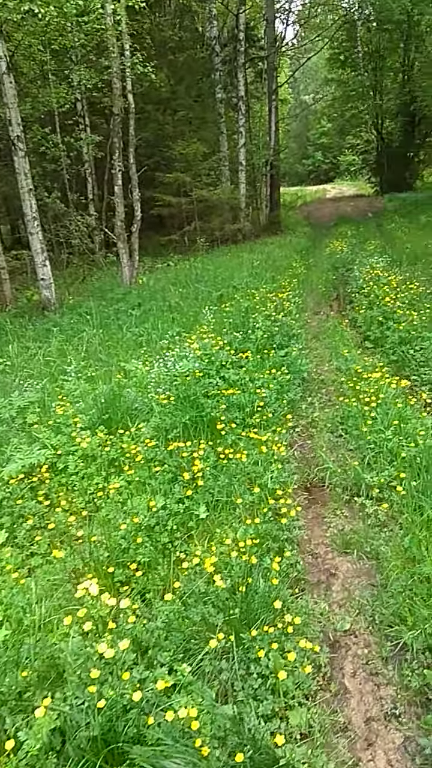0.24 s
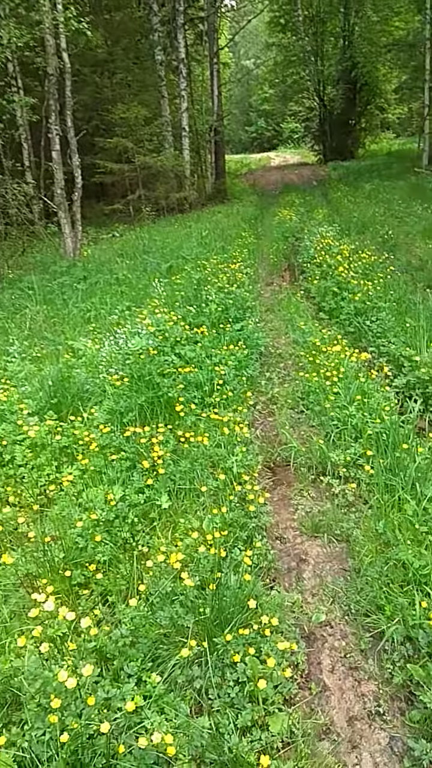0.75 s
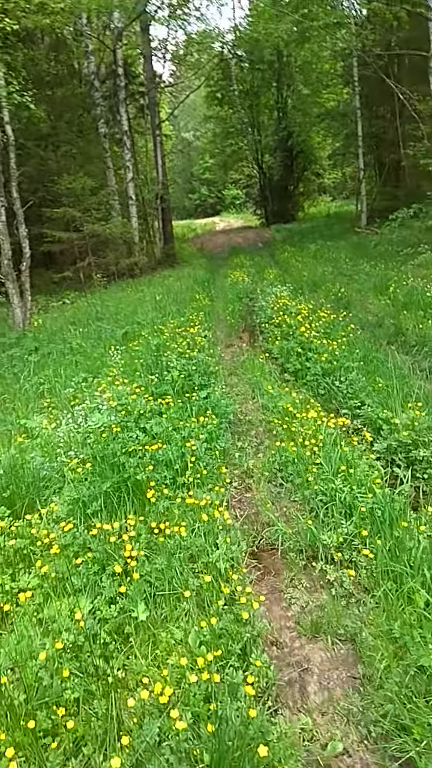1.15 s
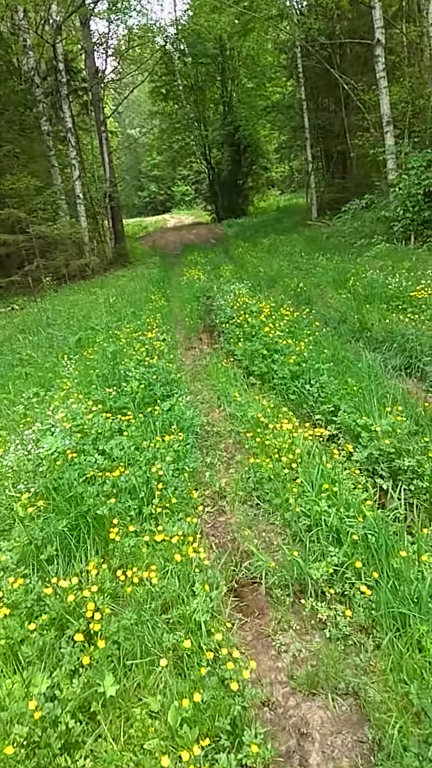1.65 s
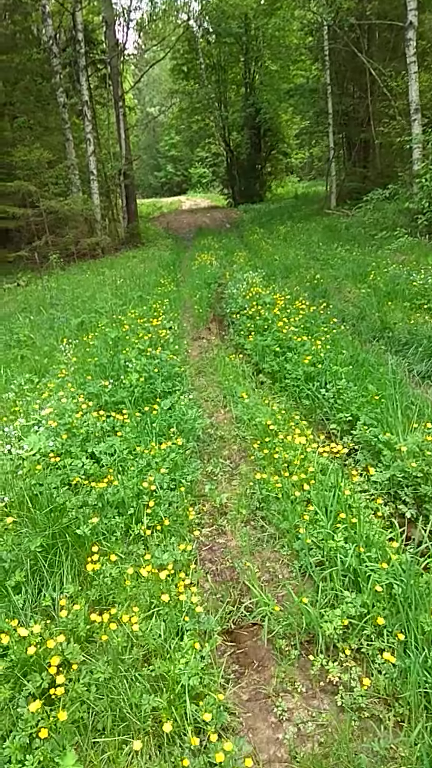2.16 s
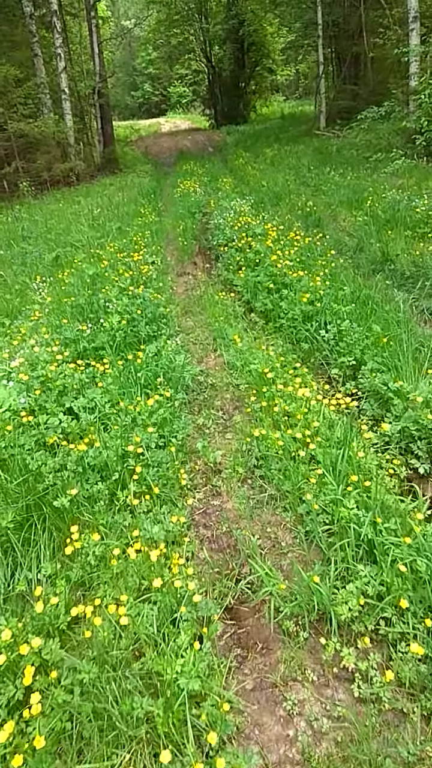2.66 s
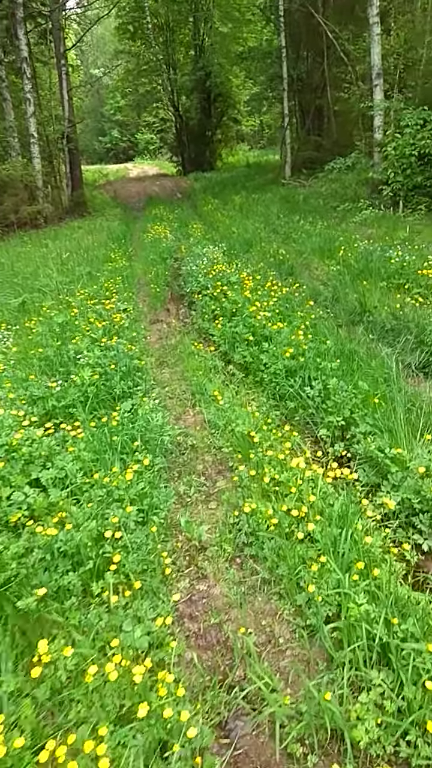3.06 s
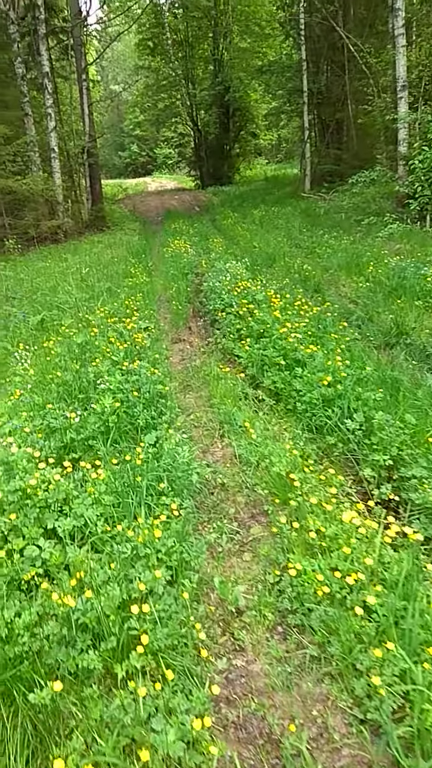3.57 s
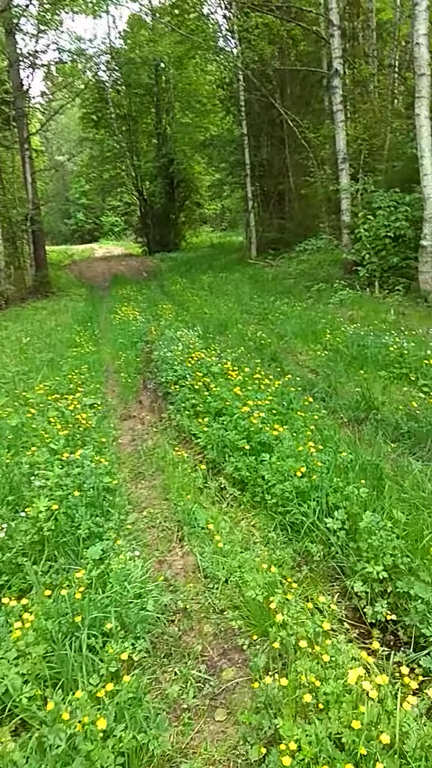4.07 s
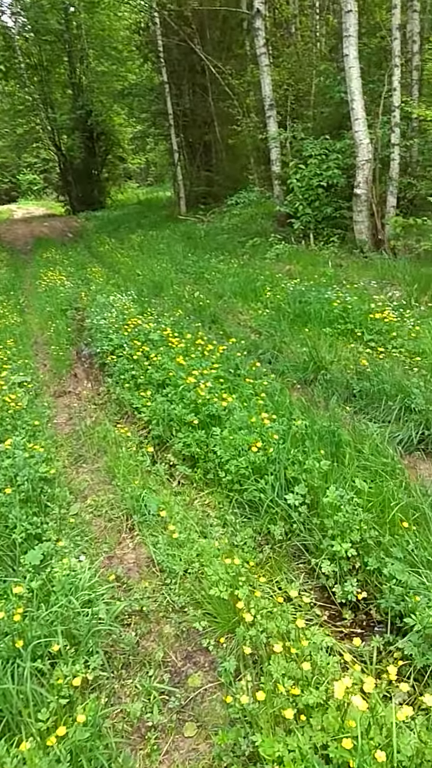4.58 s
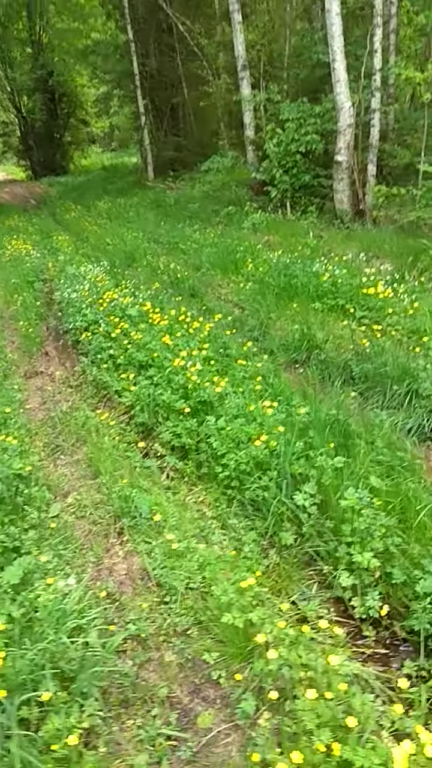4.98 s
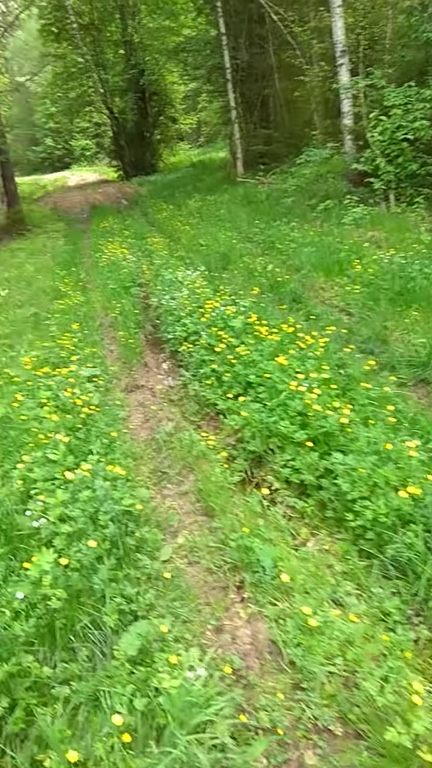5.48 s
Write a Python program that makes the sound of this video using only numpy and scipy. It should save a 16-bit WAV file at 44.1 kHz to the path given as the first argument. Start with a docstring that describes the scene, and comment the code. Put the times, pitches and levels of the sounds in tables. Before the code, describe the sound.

Close, bright swishes of long grass brush past a walker's legs in uneven sweeps, with dry stalks ticking and snapping. Heels thud softly on earth and turf. Far birds whistle at first, trill through the middle and whistle again near the end. Open forest track, quiet air; handheld stereo microphone, grass brighter and mostly louder on the left.

```python
"""Walk through long grass

Someone walks through long grass on a forest track, a two-port recorder in hand, its left port facing the legs.
Blade tips, leaves and stems rustle as patchy noise puffs under each sweep; dry stalks snap as noise bursts
through resonances; heels ring the ground and crush turf, and soles press it in dull swells.
Far songbirds whistle and trill as gliding sines scattered among the trees, over breeze and a steady hush."""
import sys
import numpy as np
from scipy import signal
from scipy.fft import rfft, irfft
from scipy.io import wavfile
from scipy.ndimage import map_coordinates

SR = 44100
rng = np.random.default_rng(int(sys.argv[2]) if len(sys.argv) > 2 else 0)


def natural_amplitude(level_db):
    """Convert a level in decibels to a linear amplitude factor, elementwise."""
    exponent = np.asarray(level_db, float) / 20
    return 10 ** exponent


def transcribe(u):
    """Save the signal u as a 16-bit wav file named by the first command-line argument.

    u: samples, shape (n,) or (channels, n), limited to [-1, 1]; the rate is SR.
    q: integer samples, one column per channel.
    """
    v = np.clip(np.atleast_2d(u).T, -1, 1)
    q = np.round(v * 32767).astype(np.int16)
    wavfile.write(sys.argv[1], SR, q)


N = 252252
HZ = np.maximum(np.fft.rfftfreq(N, 1 / SR), 1)   # frequency of each spectrum bin, floored at 1 Hz

# the right port, shadowed by the casing: (frequency [Hz], level against the left [dB])
SHADOW = [(60, -8), (300, -3.5), (1200, -4), (2200, -1.5), (3300, -1.5), (5500, -5), (9000, -12),
          (15000, -18)]
# how alike the two ports are: (frequency [Hz], likeness [0-1])
LIKENESS = [(40, 0.26), (200, 0.86), (700, 0.49), (1300, 0.53), (2500, 0.44), (5000, 0.18), (8000, 0.054),
            (10000, 0.039)]
PORT_LAG_S = 20 / 44100

# colour of the forest hush: (frequency [Hz], relative level [dB])
AIR_COLOUR = [(30, -56), (150, -71), (500, 18), (1200, -18), (3000, 25), (5000, 24), (9000, -28),
              (16000, -25)]
AIR_DB = -69.5

# lumps of air past the ports: (middle [s], length [s], level [dB])
BREEZE = [(0.34, 0.1, -70.5), (0.6, 0.081, -69.5), (1.12, 0.065, -80.5), (1.435, 0.26, -79),
          (1.72, 0.18, -79), (2.245, 0.16, -77.5), (2.79, 0.1, -79.5), (3.282, .05, -74),
          (3.394, 0.12, -68), (3.532, .08, -77), (3.63, .03, -71.5), (3.695, 0.016, -67),
          (3.754, 0.07, -66.5), (3.915, 0.06, -80), (4.227, 0.051, -75), (4.397, 0.14, -76.5),
          (5.414, 0.13, -65), (5.667, 0.072, -65)]
# colour of the breeze: (frequency [Hz], relative level per Hz [dB])
GUST_COLOUR = [(25, -42), (60, -19), (100, -13.5), (140, -1), (190, 2), (260, -1.5), (400, -8.5)]
BREEZE_REST_DB, BREEZE_RISE = -92, 0.56   # level between lumps; share of the length spent rising

# whistled notes: (time [s], length [s], start pitch [Hz], middle pitch [Hz], end pitch [Hz],
# relative level [dB], share of power heard directly [0-1])
WHISTLES = [(0.066, .12, 2300, 2337, 2370, -68, .3), (0.264, 0.068, 2330, 2445, 2270, -58, .9),
            (0.37, 0.13, 2380, 2400, 2370, -69, .2), (0.46, 0.09, 3060, 3090, 3060, -68, .2),
            (0.538, 0.037, 5310, 5330, 5200, -66, .6), (0.628, 0.03, 4650, 4520, 4430, -60, .85),
            (0.672, 0.03, 4420, 4410, 4380, -59, .85), (0.925, 0.054, 3280, 3300, 3220, -65, .4),
            (1.019, 0.025, 4600, 4900, 4760, -59, .4), (4.12, 0.05, 2720, 2630, 2550, -62, .2),
            (4.2, .05, 2680, 2600, 2520, -66, .1), (4.184, 0.12, 4100, 3790, 3730, -69, .2),
            (4.192, 0.24, 3300, 3380, 3470, -70, .1), (4.512, 0.057, 3900, 3780, 3730, -66, .3),
            (4.655, 0.06, 3880, 3720, 3530, -53, .9), (4.965, 0.175, 3150, 3125, 3150, -61, .75),
            (5.17, .15, 3160, 3140, 3120, -67, .3), (5.17, 0.16, 4420, 4380, 4330, -62, .4),
            (5.4, 0.115, 3320, 3470, 3170, -59, .92), (5.512, .035, 3160, 3130, 3200, -62, .8)]
# trilled phrases of falling chirps: (start [s], end [s], chirp rate [1/s], top pitch [Hz],
# bottom pitch [Hz], relative level [dB], last pitch over first pitch [ratio])
TRILLS = [(1.622, 2.164, 40, 4900, 3845, -54, 1), (2.174, 2.532, 13.8, 3370, 2950, -54.5, 1),
          (2.201, 2.667, 31.6, 4400, 3466, -54.5, 0.85), (2.588, 3.1, 30.0, 3800, 3044, -54.5, 0.9),
          (3.221, 3.368, 52, 4540, 4030, -56, 0.76), (4.47, 4.56, 78, 5080, 4350, -52, 1)]
TRILL_DIRECT, FOREST_T60_S = 0.22, 0.5   # share of power heard directly; 60 dB decay of the scatter

# soles rolling onto soft ground: (middle [s], length [s], level [dB])
TREAD = [(0.348, 0.16, -70.5), (0.46, 0.5, -75.5), (0.976, 0.13, -72), (1.335, 0.4, -76), (1.537, 0.1, -67),
         (1.769, 0.18, -64), (2.225, 0.077, -71.5), (2.74, 0.082, -69), (3.135, 0.099, -71),
         (3.28, .12, -76), (3.406, 0.088, -70), (3.7, 0.046, -75), (4.173, 0.18, -81), (4.33, 0.12, -77.5),
         (5.19, 0.12, -83), (5.43, 0.53, -72.5), (5.634, 0.083, -70)]
# colour of the pressed ground: (frequency [Hz], relative level per Hz [dB])
SOLE_COLOUR = [(150, -33), (260, -5), (330, -1.5), (520, 1), (800, -3), (1200, -9.5)]
TREAD_REST_DB, TREAD_RISE = -85, 0.4   # level between treads; share of the length spent rising

# heels on firm ground: (time [s], relative knock level [dB], relative level of turf crushed after it [dB])
HEELS = [(0.278, -40.5, -51), (2.514, -52, -38), (2.763, -45.5, -45.5), (3.63, -66, -50), (4.069, -72, -47),
         (4.182, -48, -61), (5.614, -41, -48)]
# rings of the packed ground: (frequency [Hz], width [Hz], level [dB])
GROUND_RINGS = [(218, 33, -3.5), (414, 68, -3), (900, 130, -2.5), (1690, 480, -9)]
# rings of the turf: (frequency [Hz], width [Hz], level of one pass [dB])
TURF_RINGS = [(307, 107, -3), (486, 145, -2), (635, 160, -3.5)]
HEEL_T60_S, TURF_T60_S = 0.0058, 0.84   # time to fall 60 dB

# snapping stalks: (time [s], relative crack level [dB], relative click level [dB],
# relative woody knock level [dB], left over right before the casing's shadow [dB])
SNAPS = [(0.099, -39, -53, -67, -3), (0.28, -49, -48, -22, 16), (0.7864, -40, -65, -49, -12),
         (1.055, -46, -42, -64, 4), (1.123, -37, -62, -63, 0), (1.234, -37, -60, -62, 8),
         (1.279, -38, -60, -62, 8), (1.347, -35, -58, -62, 8), (2.02, -41, -62, -62, 8),
         (1.259, -49, -72, -17.5, -5), (1.817, -33, -46, -35, -5), (1.919, -29, -57, -33, 2),
         (1.964, -40, -58, -61, -7), (2.0528, -35, -44.5, -25, -3), (2.2122, -25.5, -25, -3, 2),
         (2.365, -38, -70, -67, 6), (2.458, -42, -58, -62, 12), (2.558, -37, -53, -65, 18),
         (2.577, -43, -62, -56, 14), (2.8944, -28, -47, -62, -1), (3.0374, -60, -70, -10, 4),
         (3.099, -49, -48, -45, 19), (3.8218, -49, -48, -25, -8), (3.856, -41, -75, -21, 6),
         (3.952, -41, -43, -31, 20), (4.023, -30, -40.5, -53, 15), (4.398, -35.5, -55, -47, 14),
         (4.8612, -50, -65, -31, 1), (4.9214, -36, -34.5, -25, 2), (5.088, -24.5, -41, -61, 8),
         (5.104, -54, -42, -59, 0), (5.123, -50, -47, -16.5, -5), (5.3754, -12.5, -22.5, -28, 9),
         (5.385, -25, -38, -64, 14), (5.3948, -27.5, -41, -61, 2)]
# bright crack on top of a snap: (frequency [Hz], width [Hz], level [dB])
CRACK_RINGS = [(7680, 540, -2), (10560, 1950, 9), (12980, 1740, 6.5), (15670, 660, 4)]
# click in the middle of a snap: (frequency [Hz], width [Hz], level [dB])
CLICK_RINGS = [(3940, 840, -0.76), (4900, 590, -1.4), (6420, 750, 0.82)]
# woody knock at the bottom of a snap: (frequency [Hz], width [Hz], level [dB])
KNOCK_RINGS = [(775, 135, -9.5), (1300, 78, -4.5), (1690, 290, -1.5), (2320, 1700, -6.5), (2980, 980, -10)]
CRACK_T60_S, KNOCK_T60_S = 0.003, 0.0039   # the click shares the knock's decay
# many faint snaps at random times, on the same relative scale as SNAPS
SMALL_SNAPS, SMALL_CRACK_DB, SMALL_KNOCK_DB, SMALL_SPREAD_DB = 60, -56, -66, 4
# a wet blade squeaks past a boot: (time [s], length [s], start pitch [Hz], end pitch [Hz], level [dB])
SQUEAKS = [(2.325, 0.024, 8460, 7900, -47), (2.333, 0.052, 11340, 11100, -51)]

# legs sweeping through the grass: (middle [s], length [s], blade tips level [dB],
# relative left over right of the tips [dB], relative stems level [dB])
SWEEPS = [(.01, 0.067, -47.5, 7, -64.5), (0.14, 0.24, -50.5, 18, -68.5), (0.399, 0.19, -53.5, 33, -71.5),
          (0.694, 0.21, -64, 17, -75), (0.926, 0.17, -52.5, 7, -73), (1.096, 0.21, -51, 18.5, -69),
          (1.26, 0.05, -47, 12, -64), (1.305, 0.046, -42.5, 10, -64), (1.341, 0.032, -45, 8, -66),
          (1.382, 0.035, -42.5, 11, -65), (1.423, 0.038, -46.5, 9, -65), (1.508, 0.078, -49.5, 12, -73.5),
          (1.626, 0.18, -53, 14.5, -75.5), (1.84, 0.14, -40, 8.5, -64), (2.05, 0.54, -58, 12.5, -72),
          (2.384, 0.96, -56, 47, -85), (2.696, 0.053, -53, 8, -70.5), (2.807, 0.22, -48.5, 5, -68.5),
          (2.934, 0.1, -48, 8, -68.5), (3.121, 0.096, -49.5, 12, -66.5), (3.238, 0.093, -50.5, 6.5, -71),
          (3.345, 0.034, -52, 43, -77), (3.418, 0.35, -55.5, 27, -72.5), (3.817, 0.17, -46.5, 11.5, -69),
          (4.075, 0.17, -52, 15, -70), (4.408, 0.23, -54.5, 28, -77), (4.874, 0.24, -47.5, 6.5, -70),
          (5.132, 0.1, -49, 10, -69.5), (5.42, 0.63, -52.5, 17, -73), (5.728, 0.083, -40.5, 6.5, -64.5)]
# colour of the blade tips: (frequency [Hz], relative level per Hz [dB])
TIP_COLOUR = [(5500, -19), (7000, -15.5), (8500, -8.5), (11000, -4.5), (13000, -5.5), (15600, -6),
              (16300, -65)]
# colour of the leaves: (frequency [Hz], relative level per Hz [dB])
LEAF_COLOUR = [(2600, -20.5), (3400, -1.5), (4500, -3.5), (5400, -2), (6100, -10.5), (7500, -5.5),
               (9000, -9.5)]
# colour of the stems: (frequency [Hz], relative level per Hz [dB])
STEM_COLOUR = [(600, -10.5), (900, -9), (1150, -8), (1500, -5), (2300, -3.5), (3000, -3.5), (4000, -61)]
# leaves swing less than tips; sweeps off to the left stir them less
LEAVES_UNDER_TIPS_DB, LEAVES_FOLLOW, LEAVES_PAN_SHARE = -8.5, 0.32, 0.31
EDGE, SHADOWED_EDGE = 1.51, 2.8   # steepness of a swell's flanks; steeper for tips at the shadowed port


def rms_one(x):
    """Scales to rms 1."""
    return x / np.sqrt(np.mean(x ** 2) + 1e-20)


def at_hz(points, hz):
    """Reads a table on a log-frequency axis."""
    table_hz, values = np.transpose(points)
    return np.interp(np.log(hz), np.log(table_hz), values)


def drift(rate):
    """Slow chance of spread 1: random points, rate per second, joined smoothly."""
    points = rng.standard_normal(1000)
    where = np.arange(0, N + 32, 32) * rate / SR
    return map_coordinates(points, [where], order=3).repeat(32)[:N]


def ports(near, other):
    """Spectra at both ports: the right one is later, duller and only partly alike."""
    alike = at_hz(LIKENESS, HZ)
    left = rfft(near)
    right = alike * left + np.sqrt(1 - alike ** 2) * rfft(other)
    lag = np.exp(-2j * np.pi * HZ * PORT_LAG_S)
    return np.array([left, right * natural_amplitude(at_hz(SHADOW, HZ)) * lag])


def rustle(colour, per_s, spread_db, grain_s, patchy_db):
    """Tiny random contacts of uneven size, each a puff of noise; six bands flicker on their own."""
    contacts = rng.random(N) < per_s / SR
    sizes = natural_amplitude(spread_db * np.minimum(rng.exponential(1, N), 4)) * contacts
    fade = np.exp(-1 / (grain_s * SR))
    puffs = np.sqrt(signal.lfilter([1], [1, -fade], sizes ** 2) + 0.54)   # over a steady bed
    both = ports(*(puffs * rng.standard_normal((2, N)))) * natural_amplitude(at_hz(colour, HZ))
    low, high = np.log2(colour[0][0]), np.log2(colour[-1][0])
    centres = np.linspace(low, high, 6)
    out = 0
    for centre in centres:
        share = np.clip(1 - abs(np.log2(HZ) - centre) / (centres[1] - low), 0, 1)
        out = out + irfft(both * share, N) * natural_amplitude(patchy_db * drift(14))
    return out / np.sqrt(np.mean(out.mean(axis=0) ** 2))   # the average of both ports has rms 1


def swells(rows, db, edge, rise):
    """Overlapping swells, each with its middle, length and level, add up in power."""
    t = np.arange(0, N + 32, 32) / SR
    power = 1e-20
    for (middle, length, *_), level_db in zip(rows, db):
        after = t - middle - (rise - 0.5) * length   # time from the peak
        flank = np.where(after < 0, rise, 1 - rise)
        power = power + natural_amplitude(2 * level_db) * np.exp(-abs(after / length / flank) ** edge)
    return np.sqrt(power).repeat(32)[:N]


def sweeping(db, edge=EDGE):
    """Level of one part of the grass under the sweeps."""
    return swells(SWEEPS, db, edge, 0.47)


def resonate(x, modes):
    """Broad resonances side by side, signs alternating."""
    out = 0
    for k, (hz, width_hz, db) in enumerate(modes):
        r = np.exp(-np.pi * width_hz / SR)
        feed = np.array([1, 0, -1]) * (1 - r * r) / 2
        back = [1, -2 * r * np.cos(2 * np.pi * hz / SR), r * r]
        out = out + (-1) ** k * natural_amplitude(db) * signal.lfilter(feed, back, x)
    return out


def note(length_s, hz_points, db):
    """A whistled sine wavering a little as it arches through its pitches under a soft swell."""
    u = np.linspace(0, 1, int(length_s * SR))
    anchors = np.linspace(0, 1, len(hz_points))
    hz = np.polyval(np.polyfit(anchors, hz_points, len(hz_points) - 1), u)
    waver = np.interp(u * length_s * 150, np.arange(60), rng.standard_normal(60))
    phase = 2 * np.pi * np.cumsum(hz * (1 + 0.008 * waver)) / SR
    return natural_amplitude(db) * np.sin(np.pi * u) ** 0.1 * np.sin(phase)


def air():
    """The steady hush of the forest: coloured noise, unrelated at the two ports."""
    noise = rfft(rng.standard_normal((2, N)))
    return natural_amplitude(AIR_DB) * rms_one(irfft(noise * natural_amplitude(at_hz(AIR_COLOUR, HZ)), N))


def breeze():
    """Slow lumps of air rumble on the ports as low, patchy noise."""
    lumps = swells(BREEZE, np.transpose(BREEZE)[2], EDGE, BREEZE_RISE)
    level = np.hypot(lumps, natural_amplitude(BREEZE_REST_DB))
    return level * rustle(GUST_COLOUR, per_s=40, spread_db=1.5, grain_s=0.015, patchy_db=3.5)


def trill(start, end, per_s, top_hz, bottom_hz, db, sink):
    """A run of falling chirps whose pitch slides over the phrase; no two chirps are alike."""
    chirps = []
    times = np.arange(start, end, 1 / per_s)
    length_s = min(0.5 / per_s, 0.013)
    for s, (late, sharp, loud) in zip(times, rng.standard_normal((60, 3))):
        hz = np.array([top_hz, (top_hz + 2 * bottom_hz) / 3, bottom_hz])
        hz = hz * (1 + 0.0402 * sharp) * np.interp(s, [start, end], [1, sink])
        chirps.append((s + 0.06 * late / per_s, note(length_s, hz, db + loud), TRILL_DIRECT))
    return chirps


def birds():
    """Far songbirds: a direct path that flutters through leaves, and a long scatter among the trunks."""
    notes = [(s, note(length, hz, db), direct) for s, length, *hz, db, direct in WHISTLES]
    for phrase in TRILLS:
        notes += trill(*phrase)
    song = np.zeros((2, N))   # direct share, scattered share
    for s, sound, direct in notes:
        i = round(s * SR)
        song[:, i:i + len(sound)] += sound * np.sqrt([[direct], [1 - direct]])
    t = np.arange(SR) / SR
    fade = natural_amplitude(-60 * t / FOREST_T60_S) * np.minimum(t / 0.0051, 1)
    scatter = rng.standard_normal((2, SR)) * fade
    scatter /= np.sqrt(np.sum(scatter ** 2, axis=1, keepdims=True))
    wet = signal.fftconvolve(song[1:], scatter, axes=1)[:, :N]
    flutter = natural_amplitude(3.5 * np.array([drift(60), drift(60)]))
    return flutter * song[0] * natural_amplitude([[-1.5], [1.5]]) + natural_amplitude(2) * wet


def soles():
    """Weight rolling onto turf: a dull, lumpy crush of low noise puffs."""
    treads = swells(TREAD, np.transpose(TREAD)[2], EDGE, TREAD_RISE)
    level = np.hypot(treads, natural_amplitude(TREAD_REST_DB))
    return level * rustle(SOLE_COLOUR, per_s=90, spread_db=1.4, grain_s=0.015, patchy_db=2.6)


def heels():
    """A heel lands: a short blunt push rings the packed ground, then the turf crushes under the weight."""
    push, crush = np.zeros(N + SR), np.zeros((2, N + SR))
    t = np.arange(SR // 3) / SR
    grits = rng.standard_normal((len(HEELS), 2, len(t)))
    for (s, knock_db, turf_db), grit in zip(HEELS, grits):
        i = round(s * SR)
        here = slice(i, i + len(t))
        push[here] += natural_amplitude(knock_db + 7 - 60 * t / HEEL_T60_S) * (1 + grit[0])
        crush[:, here] += natural_amplitude(turf_db - 60 * (t / TURF_T60_S) ** 2) * grit
    turf = resonate(resonate(crush, TURF_RINGS), TURF_RINGS)   # two passes sharpen the rings
    ring = resonate(push, GROUND_RINGS) + turf
    return irfft(ports(*ring[:, :N]), N)


def small_snaps():
    """Faint snaps at random times, louder under a strong sweep."""
    when = rng.uniform(0, N / SR - 0.05, SMALL_SNAPS)
    size_db = SMALL_SPREAD_DB * rng.standard_normal((SMALL_SNAPS, 3))
    stirred = sweeping(np.transpose(SWEEPS)[2])
    size_db += 20 * np.log10(stirred[(when * SR).astype(int), None] / stirred.mean())
    return [(s, SMALL_CRACK_DB + crack, SMALL_KNOCK_DB + click, SMALL_KNOCK_DB + knock, 3)
            for s, (crack, click, knock) in zip(when, size_db)]


def snaps():
    """A snap is a sharp burst of tearing fibres with a faint frayed tail, through the stalk's resonances."""
    near, far = np.zeros(N), np.zeros((2, N))
    t = np.arange(1500) / SR
    fray, rise = natural_amplitude(-22 - 60 * t / 0.036), np.minimum(t / 0.00079, 1)
    crack_fade = rise * (natural_amplitude(-60 * t / CRACK_T60_S) + fray)
    knock_fade = rise * (natural_amplitude(-60 * t / KNOCK_T60_S) + fray)
    for s, crack_db, click_db, knock_db, pan_db in SNAPS + small_snaps():
        tearing = rng.standard_normal((2, len(t)))
        crack = natural_amplitude(crack_db + 12) * resonate(tearing * crack_fade, CRACK_RINGS)
        click = natural_amplitude(click_db + 19.5) * resonate(tearing * knock_fade, CLICK_RINGS)
        knock = natural_amplitude(knock_db - 0.5) * resonate(tearing * knock_fade, KNOCK_RINGS)
        sound = crack + click + knock
        i = round(s * SR)
        near[i:i + len(t)] += sound[0]
        far[:, i:i + len(t)] += sound * natural_amplitude(-pan_db)
    for s, length, *hz, db in SQUEAKS:
        squeak = note(length, hz, db)
        i = round(s * SR)
        near[i:i + len(squeak)] += squeak
        far[:, i:i + len(squeak)] += squeak
    return irfft(np.array([rfft(near), ports(*far)[1]]), N)


def grass():
    """Each sweep bends tips, leaves and stems aside: three colours of rustle, each with its own swells."""
    tips_db, pan_db, stems_db = np.transpose(SWEEPS)[2:]
    mean_db = tips_db.mean()
    leaves_db = mean_db + LEAVES_UNDER_TIPS_DB + LEAVES_FOLLOW * (tips_db - mean_db)
    leaves_db = leaves_db - LEAVES_PAN_SHARE * (pan_db - 5.5)
    sides = np.array([sweeping(tips_db), sweeping(tips_db + 9 - pan_db, SHADOWED_EDGE)])
    tips = sides * rustle(TIP_COLOUR, per_s=1000, spread_db=3, grain_s=0.002, patchy_db=1.6)
    leaves = sweeping(leaves_db) * rustle(LEAF_COLOUR, per_s=700, spread_db=2.3, grain_s=0.002, patchy_db=2.8)
    stems = sweeping(stems_db + 5) * rustle(STEM_COLOUR, per_s=450, spread_db=2.5, grain_s=0.003, patchy_db=2.5)
    return tips + leaves + stems


def scene():
    """Air, breeze and birds behind the walker's soles, heels, snapping stalks and grass."""
    return air() + breeze() + birds() + soles() + heels() + snaps() + grass()


def roll_off(x):
    """The treble ends steeply here."""
    return signal.sosfilt(signal.butter(12, 15960, fs=SR, output="sos"), x)


def record(dry):
    """Turns the finished mix into the sound that is written out."""
    return roll_off(dry)


dry = scene()
out = record(dry)
transcribe(out)
```